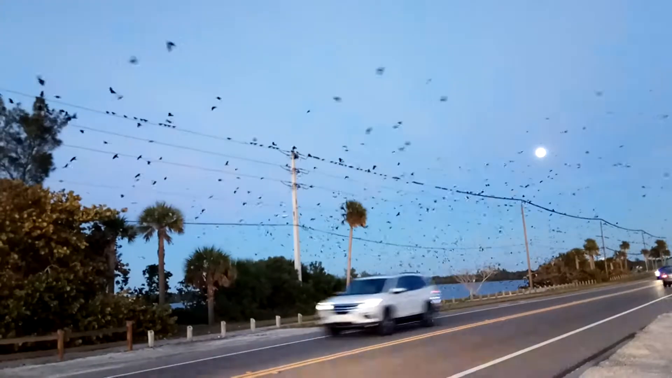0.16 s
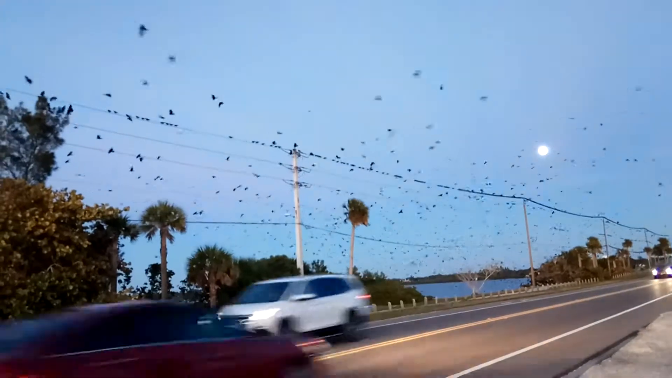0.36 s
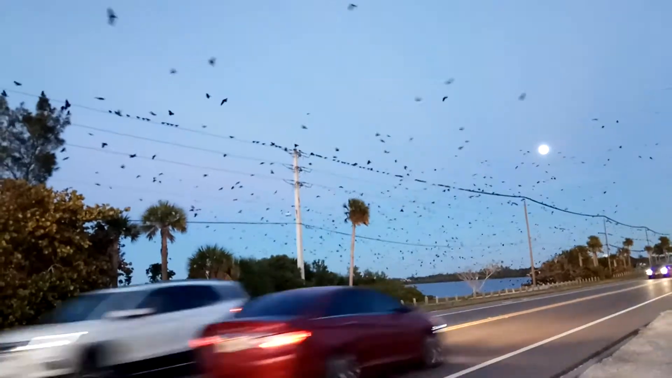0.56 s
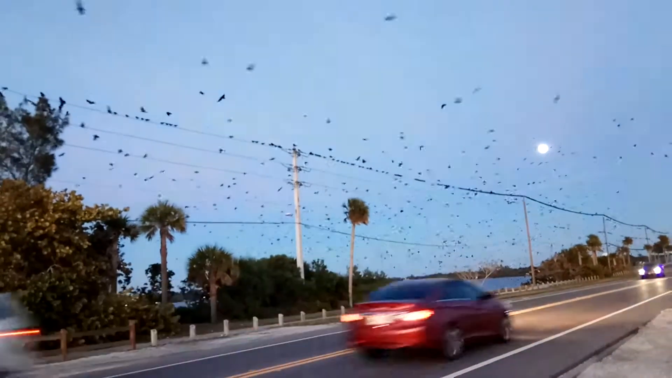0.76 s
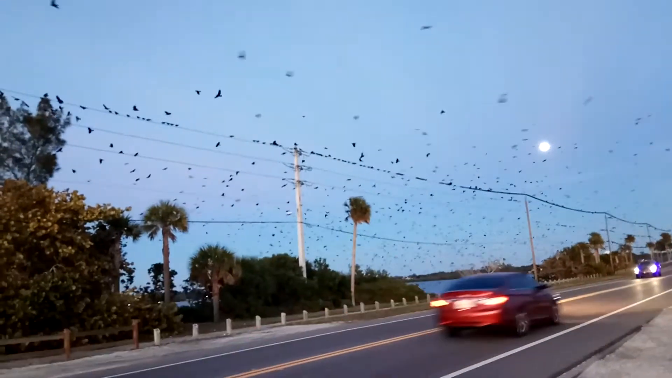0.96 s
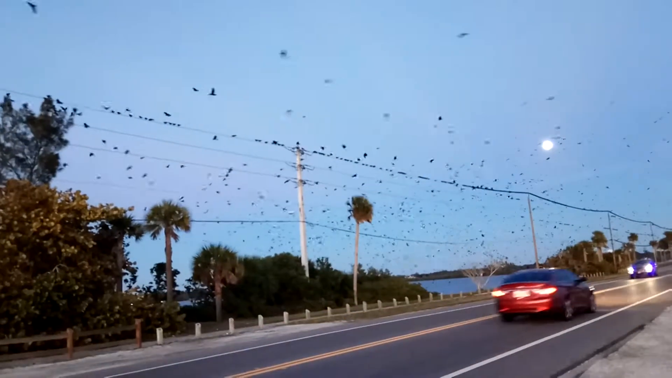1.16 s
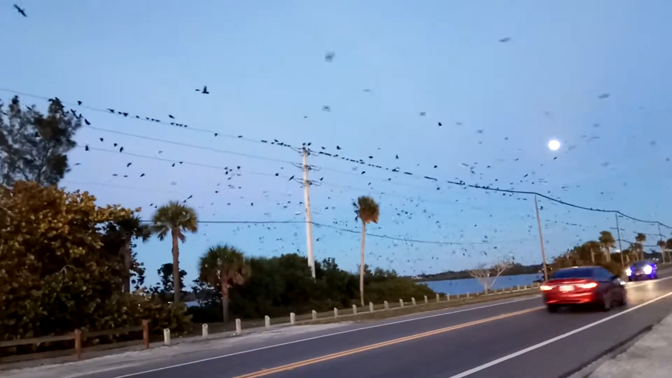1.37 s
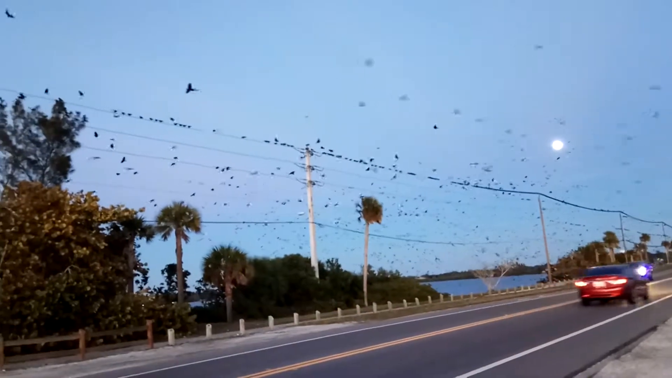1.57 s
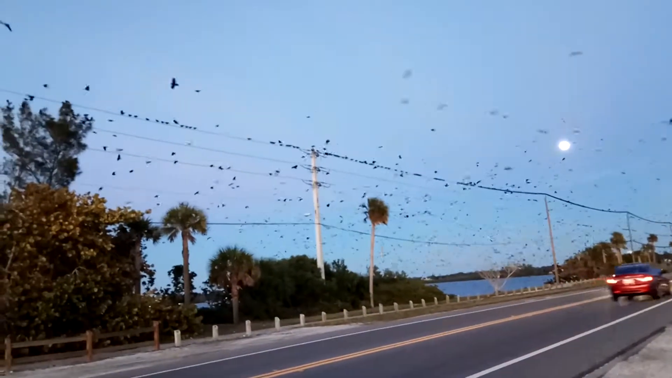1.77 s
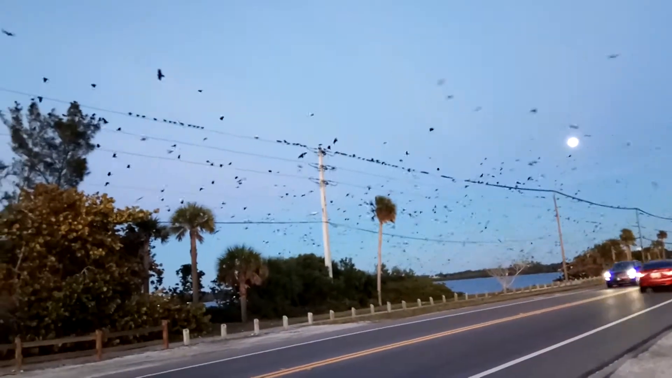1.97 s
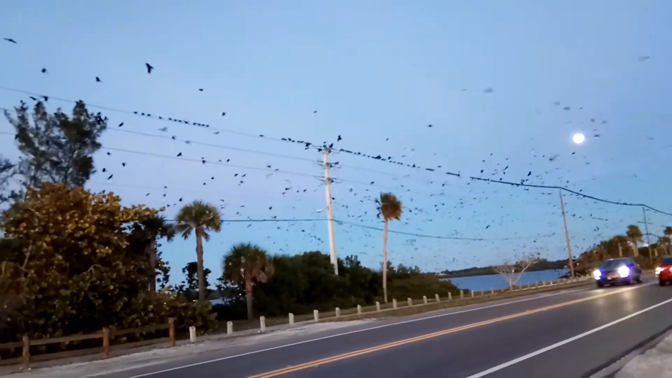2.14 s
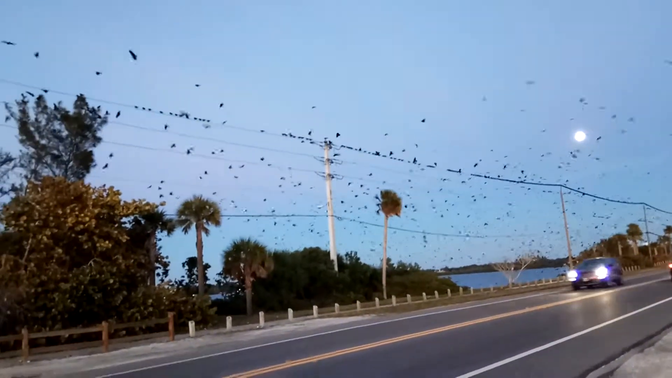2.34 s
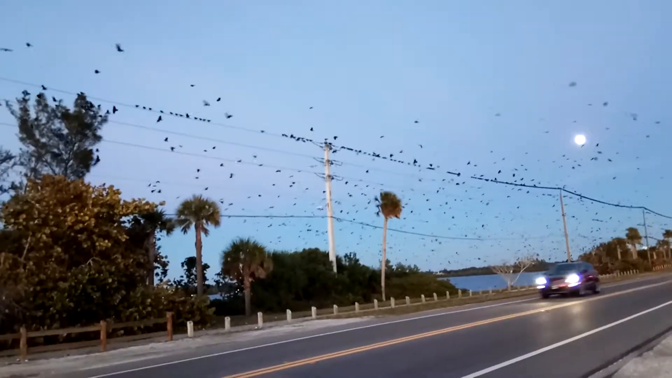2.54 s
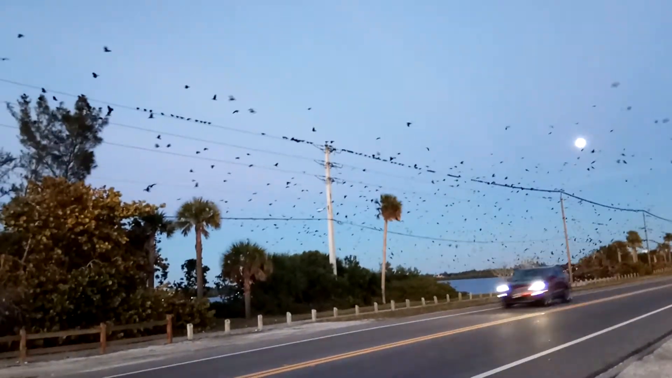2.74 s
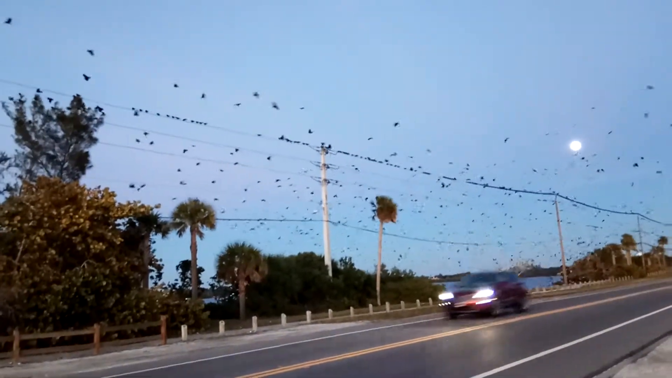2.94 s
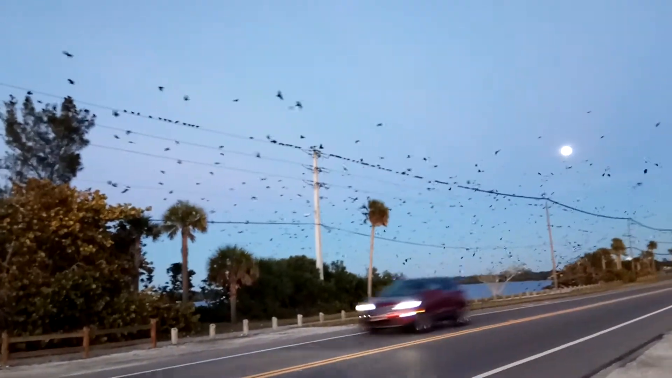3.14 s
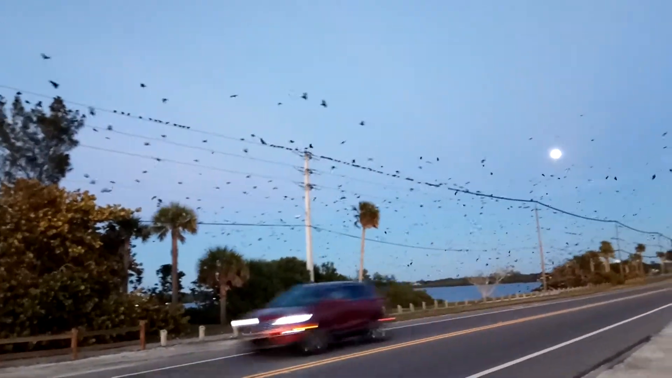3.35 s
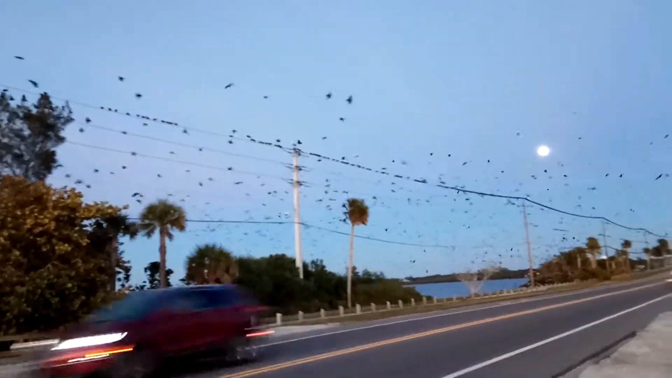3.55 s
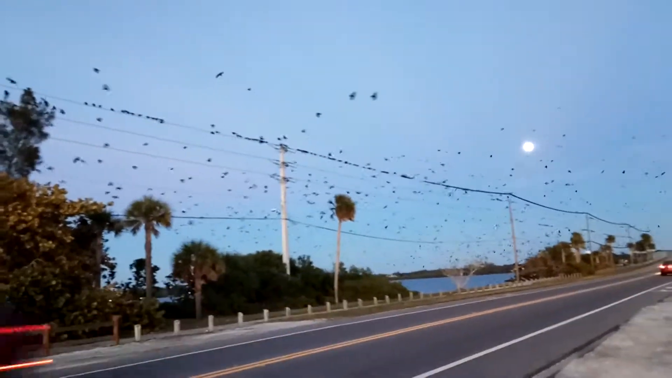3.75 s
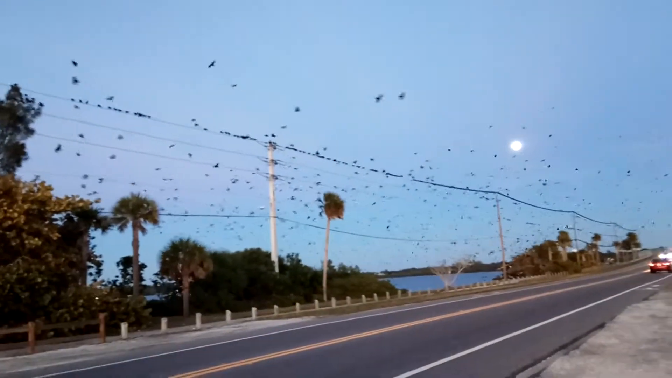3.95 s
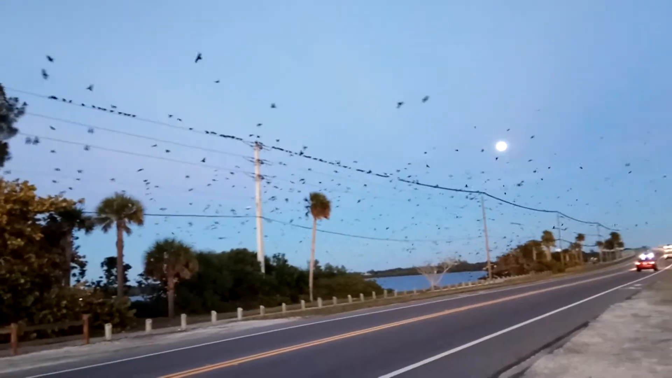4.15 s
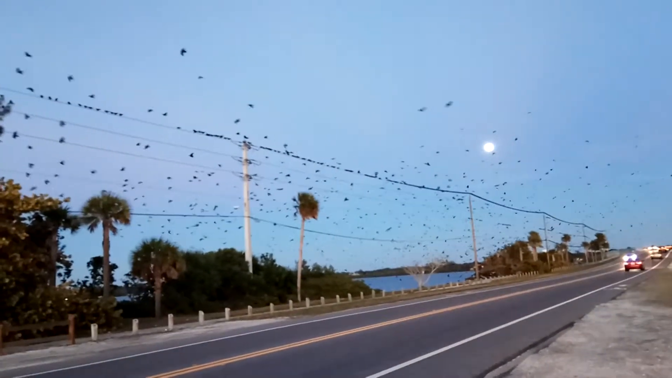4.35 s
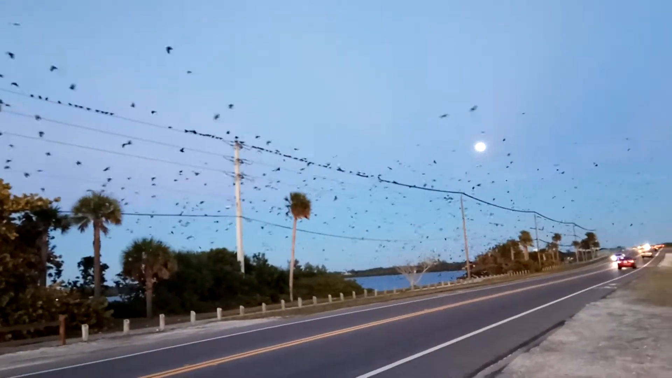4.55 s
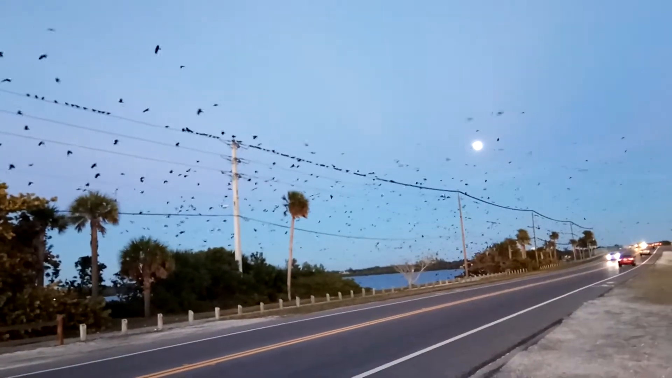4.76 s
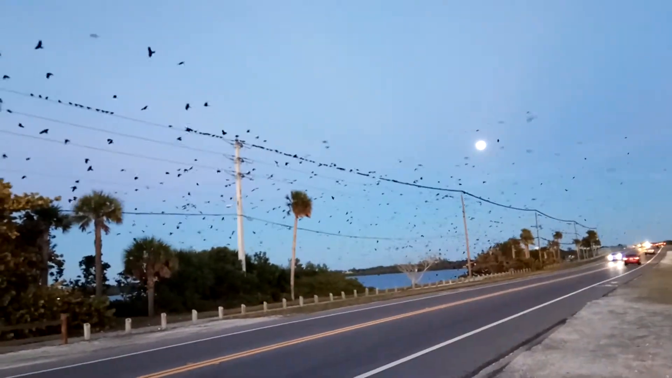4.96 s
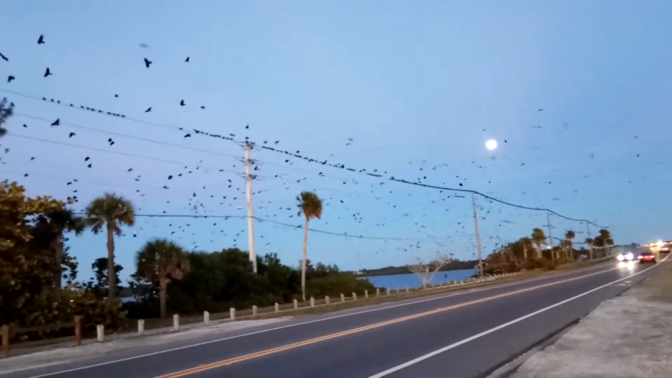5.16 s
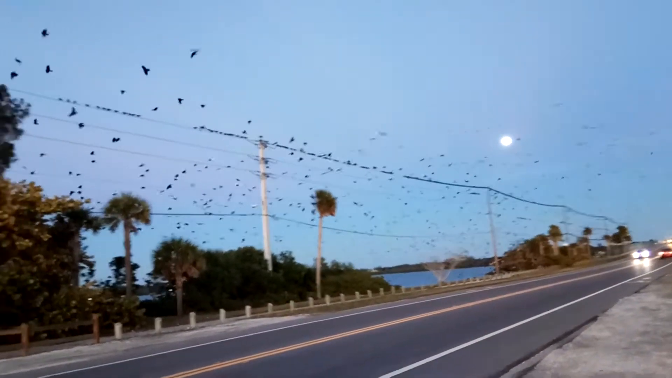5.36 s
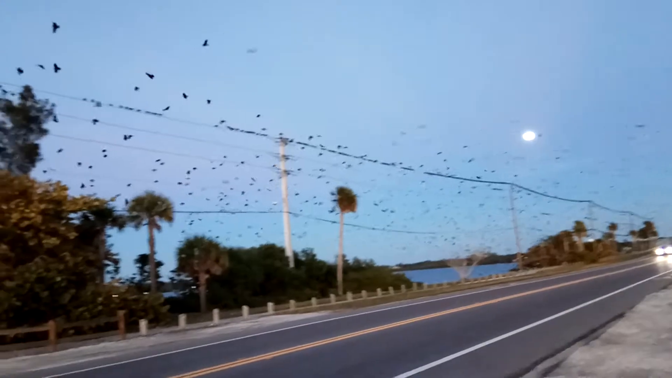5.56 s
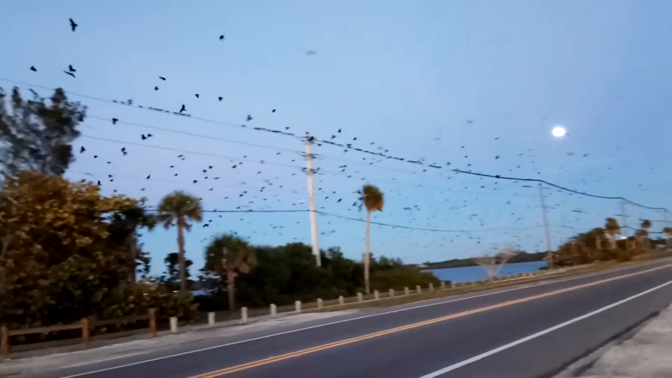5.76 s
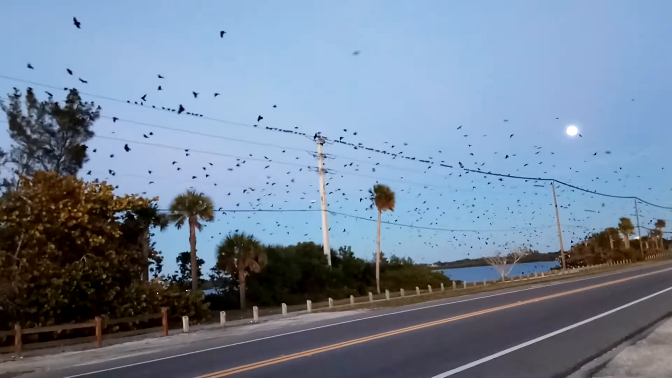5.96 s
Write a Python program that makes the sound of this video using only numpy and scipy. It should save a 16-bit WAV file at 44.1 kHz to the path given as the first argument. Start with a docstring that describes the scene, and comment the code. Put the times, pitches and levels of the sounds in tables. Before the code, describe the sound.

A stereo microphone at a roadside picks up passing cars and gusty wind over faint distant traffic. A car goes by right at the start, and a second passes in the opposite direction at about 0.9 seconds, their tyres roaring and hissing as they sweep across from side to side. From about 0.8 to 1.3 seconds hard gusts buffet the microphone with low rumbling and sharp pops, mostly on the right. The buffeting returns from about 2 to 3.3 seconds, strongest near 2.8, with two faint, thin hisses on the right. The traffic dips briefly under the hardest gusts. A third car approaches with a tyre whine, passes at about 3.9 seconds and fades away with a hollow hiss. The wind is lighter from then on, with small gusts near 4.8 and 5.7 seconds.

```python
"""Three cars in gusty wind

At a roadside microphone pair, one car drives away in the near lane and two come by in the far lane.
Their tyres roar, whine and hiss, sweeping from port to port over distant traffic.
Gusts buffet each port, eddies pop, and a thin hiss swells twice on the right.
The recorder's gain control ducks the traffic under the hardest gusts."""
import sys
import numpy as np
from scipy.fft import rfft, irfft, next_fast_len
from scipy.io import wavfile
from scipy.ndimage import uniform_filter1d, map_coordinates

SR = 44100
rng = np.random.default_rng(int(sys.argv[2]) if len(sys.argv) > 2 else 0)


def wrap_up_sound(samples):
    """Save the sound to the file named by the first command line argument, as 16-bit audio."""
    columns = np.atleast_2d(samples).T
    # keep every value between -1 and 1, then stretch to whole-number steps
    tamed = np.clip(columns, -1, 1)
    steps = np.round(tamed * 32767).astype(np.int16)
    wavfile.write(sys.argv[1], SR, steps)


N = 265129
TIME_S = np.arange(N) / SR


def amp(db):
    """Decibels to gain."""
    return 10 ** (np.asarray(db) / 20)


def unit_rms(x):
    """Scale to rms 1."""
    return x / np.sqrt(np.mean(x ** 2) + 1e-20)


def curve_at(points, hz):
    """Interpolate (f/Hz, value) points on a log frequency axis."""
    knots_hz, values = np.transpose(points)
    return np.interp(np.log(hz + 1), np.log(knots_hz + 1), values)


def filtered(x, response):
    """Zero-phase filter with gain response(hz)."""
    size = next_fast_len(N + 8192)
    return irfft(rfft(x, size) * response(np.fft.rfftfreq(size, 1 / SR)), size)[..., :N]


def shaped(x, spectrum):
    """Filter by an (f/Hz, level/dB) curve."""
    return filtered(x, lambda hz: amp(curve_at(spectrum, hz)))


def coloured_noise(spectrum):
    """Noise of the given spectrum, rms 1."""
    return unit_rms(shaped(rng.standard_normal(N), spectrum))


def delayed(x, ms):
    """Time-varying fractional delay."""
    return map_coordinates(x, [np.arange(N) - ms * SR / 1000], order=3, mode="wrap")


def waver(depth_db, knots_per_s):
    """Moving air makes a level waver: smooth random gain."""
    knots = rng.standard_normal(1024)
    return amp(depth_db * map_coordinates(knots, [TIME_S * knots_per_s]))


# Tread roar, far off: f/Hz, level/dB
FAR_ROAR = [(40, 16), (100, 12.5), (190, 12), (280, 7.5), (400, 6), (600, 7.5), (780, 14), (950, 18),
            (1200, 13), (1650, 15), (2050, 10.5), (2600, 5), (3300, 0.5), (4300, -3.5), (5400, -9),
            (6700, -12.6), (8200, -21.5), (10000, -28), (13000, -56), (15200, -29)]
def distant_traffic(gain_db=-46):
    """Steady roar from far down the road."""
    return amp(gain_db) * shaped(rng.standard_normal((2, N)), FAR_ROAR)


# Hiss band: f/Hz, level/dB
HISS_BAND = [(4800, -31), (5600, -1), (6100, 0), (6600, -8), (7400, -46)]
# Hiss swells: t/s, half length/s, level/dB
HISS_SWELLS = [(2.675, 0.054, -37.5), (2.962, 0.12, -40.5)]
def thin_hiss():
    """A narrow hiss comes and goes at the right port."""
    swell = sum(amp(db) * np.exp(-((TIME_S - at_s) / half_s) ** 2) for at_s, half_s, db in HISS_SWELLS)
    return np.array([np.zeros(N), swell * coloured_noise(HISS_BAND)])


# Wind between gusts: left level/dB, right level/dB
LULL_DB = [-32.5, -35]
# Gusts: t/s, length/s, level/dB, port (0 left, 1 right)
PORT_GUSTS = [(0, 0.16, -23.5, 1), (0.268, 0.043, -18.5, 1), (0.403, 0.38, -21.5, 1), (0.475, 0.022, -9, 0),
              (0.826, 0.017, -5.5, 1), (0.854, 0.043, -2.5, 1), (.91, 0.0093, -4.5, 1),
              (0.941, 0.01, -1.5, 1), (0.996, 0.019, -3, 1), (1.042, 0.035, 0, 1), (1.108, 0.017, -13.5, 1),
              (0.92, 0.16, -16, 0), (1.127, 0.033, -9.5, 0), (1.152, 0.022, -6.5, 1), (1.202, 0.024, -6, 1),
              (1.247, 0.026, -14.5, 0), (1.3, 0.36, -18, 1), (1.594, 0.12, -25, 0), (1.85, 0.17, -20, 1),
              (2.02, 0.24, -20, 0), (2.061, 0.02, -6, 1), (2.107, 0.017, -6, 1), (2.167, 0.054, -12, 1),
              (2.196, 0.06, -15.5, 0), (2.333, 0.099, -16.5, 1), (2.445, 0.039, -13.5, 1),
              (2.508, .03, -16.5, 1), (2.555, 0.1, -14, 0), (2.61, 0.15, -16, 1), (2.745, 0.028, 0, 1),
              (2.823, 0.017, -1.5, 1), (2.85, 0.1, -9, 0), (2.9, 0.018, -12, 1), (2.964, 0.058, -13.5, 1),
              (3.048, 0.086, -13, 1), (3.17, 0.11, -13.5, 1), (2.98, 0.46, -23, 0), (3.469, .18, -20.5, 1),
              (3.71, 0.47, -26.5, 1), (3.853, 0.025, -20, 0), (4.117, 0.059, -22, 0),
              (4.742, 0.017, -16, 1), (4.865, 0.085, -25, 0), (4.878, 0.02, -16, 1),
              (4.927, 0.14, -24.5, 1), (5.523, 0.53, -23.5, 1), (5.713, 0.027, -12, 1),
              (5.725, 0.041, -20.5, 0)]
def wind_level_db(port, attack_s=0.0068, release_s=0.019):
    """Wind strength at one port: gusts rise, hold and die away over a light breeze."""
    power = np.full(N, amp(LULL_DB[port]) ** 2)
    for start_s, length_s, db, struck in PORT_GUSTS:
        if round(struck) == port:
            fade = np.maximum((start_s - TIME_S) / attack_s, (TIME_S - start_s - length_s) / release_s)
            power += (amp(db) * np.exp(-np.clip(fade, 0, 20))) ** 2
    return 10 * np.log10(power * waver(depth_db=3.0, knots_per_s=28) ** 2)


# Slow eddies: f/Hz, level/dB
SLOW_EDDIES = [(15, -29.5), (32, -53), (50, -7), (75, 5), (105, 4.5), (150, -0.5), (210, -9), (300, -23.5),
               (500, -41.5), (1200, -105)]
# Fine eddies of a hard gust: f/Hz, level/dB
FINE_EDDIES = [(60, 5.5), (150, 12), (260, 3.5), (430, -5), (650, -15.5), (1200, -26), (3000, -92)]
def wind_buffet(level_db, trim_db, flutter_db, hard_db=-13, growth=0.84, evenness=0.89):
    """The harder the wind, the more fine eddies burst from the crests of the slow ones."""
    slow = coloured_noise(SLOW_EDDIES)
    crests = (slow ** 2 + 0.071) ** (1 / 4)
    bursts = unit_rms(crests * coloured_noise(FINE_EDDIES))
    eddies = slow + amp(flutter_db + growth * (level_db - hard_db)) * bursts
    # gust strength, more than chance, sets eddy size
    power = np.abs(uniform_filter1d(eddies ** 2, size=1100))
    swell = uniform_filter1d(power, size=400) + 1e-6
    return amp(level_db + trim_db) * unit_rms(eddies / swell ** (evenness / 2))


# Eddy slaps: t/s, peak/dB, width/s, port (0 left, 1 right)
EDDY_POPS = [(0.86, 4, 0.00061, 1), (.943, -4, 0.00071, 1), (1.0091, 5, 0.00024, 1), (1.075, 1, 0.00036, 1),
             (1.202, -2.5, 0.00067, 1), (1.555, -8.5, 0.0017, 1), (2.06, 3, 0.0011, 1),
             (2.08, -4.5, 0.00042, 1), (2.124, -1.5, 0.0009, 1), (2.197, -5, 0.0014, 1),
             (2.531, -6.5, 0.001, 1), (2.701, -4, 0.0016, 1), (2.75, 4, 0.00061, 1), (2.769, 8, 0.00022, 1),
             (2.774, 6, 0.0022, 1), (2.818, -2, 0.00044, 1), (2.917, -1.5, 0.00075, 0)]
def eddy_pops():
    """A sharp push and pull of pressure as an eddy breaks on a port."""
    ports = np.zeros((2, N))
    for at_s, db, width_s, port in EDDY_POPS:
        u = (TIME_S - at_s) / width_s
        ports[port] -= amp(db) * u * np.exp((1 - u ** 2) / 2)
    return ports


# Housing paths: bearing (-1 ahead, 0 abreast, +1 behind), left lag/ms,
# then for left and for right: detour/ms, detour gain, treble gain added to the straight path
HOUSING_PATHS = [(-0.986, -0.26, 0.23, -0.66, -0.46, 0.26, 0.94, -1.02),
                 (-0.92, -0.13, 0.24, -0.62, -0.42, 0.33, 0.44, -0.7),
                 (-0.723, -0.018, 0.3, -0.39, -0.47, 0.26, 0.402, -0.68),
                 (-0.35, 0.2, 0.36, -0.88, -0.95, 0.25, 0.29, -0.431),
                 (0.069, 0.32, 0.43, -0.673, -1.18, 0.23, 0.27, -0.52),
                 (0.47, 0.39, 0.41, -0.77, -0.35, 0.063, 0.51, -0.21),
                 (0.62, 0.47, 0.42, -0.29, -0.698, 0.23, -0.5, -0.34),
                 (0.876, 0.46, 0.26, -0.24, -0.61, 0.2, 0.21, -0.69),
                 (1.0, 0.34, 0.25, -0.63, -0.79, 0.15, 0.53, -0.37)]
def round_housing(sound, bearing, treble_hz=1580):
    """Sound reaches the ports apart, short waves also by a detour; the notches glide with bearing."""
    bearings, *columns = np.transpose(HOUSING_PATHS)
    paths = [np.interp(bearing, bearings, column) for column in columns]
    lag_ms, left_ms, left_echo, left_shade, right_ms, right_echo, right_shade = paths
    treble = filtered(sound, lambda hz: hz ** 4 / (hz ** 4 + treble_hz ** 4))
    left = delayed(sound + left_shade * treble, lag_ms) + left_echo * delayed(treble, lag_ms + left_ms)
    right = sound + right_shade * treble + right_echo * delayed(treble, right_ms)
    return np.array([left, right])


# Whine beamed ahead of a tyre: f/Hz, level/dB
TYRE_WHINE = [(700, -32), (880, -2), (1020, 0), (1180, -1), (1500, -12), (4000, -100)]
# Hollow, hissing rush behind it: f/Hz, level/dB
TYRE_WAKE = [(120, -4), (300, 6), (450, -2), (720, 8), (1100, -22), (1500, -1), (1850, 4), (2200, -3),
             (2800, -25), (5000, -14), (6000, -9), (7000, 7), (8000, -5), (9500, -30), (14000, -60)]
def tyre_beams(leaving, whine_db=-12, wake_db=-17, width=0.2):
    """Tread whines as it meets the road, hisses as it lifts off; leaving: -1 coming, +1 going."""
    front_lobe = np.exp(-((leaving + 0.77) / width) ** 2)
    rear_lobe = np.exp(-((leaving - 0.63) / width) ** 2)
    whine = amp(whine_db) * front_lobe * coloured_noise(TYRE_WHINE)
    wake = amp(wake_db) * rear_lobe * coloured_noise(TYRE_WAKE)
    return whine + wake


# Tread roar and hiss, close by: f/Hz, level/dB
NEAR_ROAR = [(40, -8), (100, 9.5), (180, 9), (280, 2), (400, 1), (600, 9), (780, 9.5), (950, 15),
             (1200, 10.5), (1650, 11), (2050, 6), (2600, -9), (3300, -1), (4300, -4), (5400, -5.5),
             (6700, -3), (8200, -14.5), (10000, -30), (13000, -34.5), (15200, -22)]
def tread_roar(noise, closeness):
    """Tread noise changes colour as the car nears; closeness: 0 far, 1 near."""
    return closeness * shaped(noise, NEAR_ROAR) + (1 - closeness) * shaped(noise, FAR_ROAR)


# Tyre sound arriving straight from the car: f/Hz, power share
DIRECT_SHARE = [(400, 0.91), (900, .94), (2300, 0.97), (4000, 0.92), (7000, 0.79), (12000, 0.5)]
# Cars: abreast t/s, heading (+1 oncoming, -1 driving away), distance/m, axle level/dB
CAR_PASSES = [(.22, -1, 7.6, -6.5), (.88, 1, 10.35, -2), (3.87, 1, 9.57, -3)]
def passing_cars(speed_m_per_s=26.56, wheelbase_m=2.7, near_m=18.6, forward_db=0.89, horn_db=1.75):
    """Each axle roars from its own bearing, swelling and fading with distance."""
    direct, power, close_power = np.zeros((2, N)), np.zeros(N), np.zeros(N)
    for abreast_s, heading, distance_m, db in CAR_PASSES:
        for axle_m in (-wheelbase_m / 2, wheelbase_m / 2):
            road_m = heading * speed_m_per_s * (TIME_S - abreast_s) + axle_m
            range_m = np.hypot(road_m, distance_m)
            bearing = road_m / range_m
            leaving = heading * bearing
            # the tyre-road wedge throws sound along the road, more forwards than back
            gain = amp(db + horn_db * bearing ** 2 - forward_db * leaving) / range_m
            closeness = 1 / (1 + (range_m / near_m) ** 4)
            tread = tread_roar(rng.standard_normal(N), closeness) + tyre_beams(leaving)
            direct += gain * round_housing(tread, bearing)
            power += gain ** 2
            close_power += gain ** 2 * closeness
    # scatter from road, verge and trees, uncorrelated between ports
    scattered = np.sqrt(power) * tread_roar(rng.standard_normal((2, N)), close_power / power)
    scattered = filtered(scattered, lambda hz: np.sqrt(1 - curve_at(DIRECT_SHARE, hz)))
    return filtered(direct, lambda hz: np.sqrt(curve_at(DIRECT_SHARE, hz))) + scattered


# Left-right tone balance, highest treble much duller on the right: f/Hz, level/dB (+ left, - right)
TONE_BALANCE = [(400, -0.7), (600, -0.2), (780, -0.5), (950, -0.5), (1200, -0.2), (1650, -0.55), (2050, 1),
                (2600, -3.5), (3300, -1.5), (4300, 1), (5400, -3), (6700, -6.5), (8200, 0.1), (10000, 10),
                (13000, 9), (15200, -1.5)]
def scene():
    """Traffic through moving air, separate wind on each port."""
    wind = np.array([wind_buffet(wind_level_db(port=0), trim_db=-3.0, flutter_db=2.5),
                     wind_buffet(wind_level_db(port=1), trim_db=-2, flutter_db=-5.5)])
    air_gain = waver(depth_db=0.45, knots_per_s=22)
    traffic = passing_cars() + distant_traffic()
    traffic = filtered(traffic, lambda hz: amp(np.outer([1, -1], curve_at(TONE_BALANCE, hz))))
    return air_gain * traffic + wind + eddy_pops() + thin_hiss()


def gain_control(x, threshold_db=-16, slope=0.52, recovery_db_per_s=55):
    """The louder port turns both down at once; the gain then creeps back."""
    power = np.abs(uniform_filter1d(x ** 2, size=400)).max(axis=0)
    level_db = 10 * np.log10(power + 1e-12)
    needed_db = slope * np.maximum(level_db - threshold_db, 0)
    recovery_db = recovery_db_per_s * TIME_S
    cut_db = np.maximum.accumulate(needed_db + recovery_db) - recovery_db
    smooth_cut_db = uniform_filter1d(uniform_filter1d(cut_db, size=160), size=60)
    return x * amp(-smooth_cut_db)


def record(dry, ceiling=0.95, low_cut_hz=36, top_hz=15600):
    """Recorder: gain control, soft clipping, low cut and band limit."""
    held = gain_control(dry)
    rounded = held / (1 + (held / ceiling) ** 4) ** (1 / 4)
    return filtered(rounded, lambda hz: (hz < top_hz) * hz ** 4 / (hz ** 4 + low_cut_hz ** 4))


dry = scene()
out = record(dry)
wrap_up_sound(out)
```